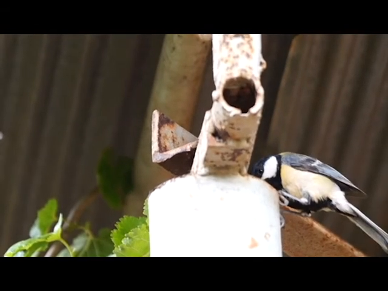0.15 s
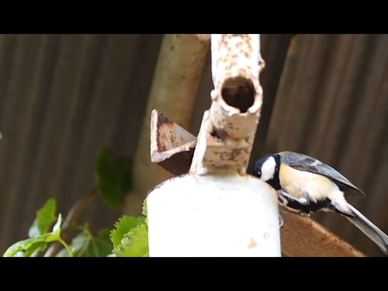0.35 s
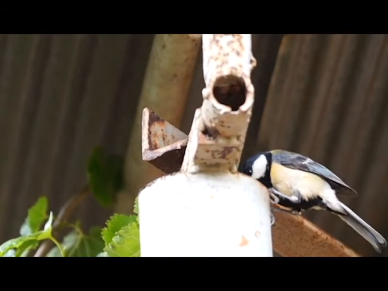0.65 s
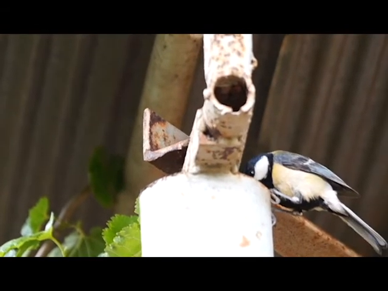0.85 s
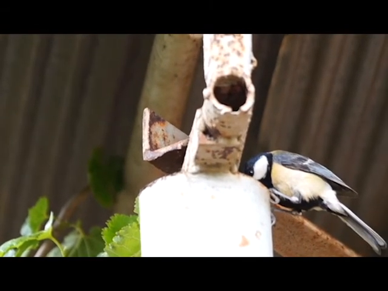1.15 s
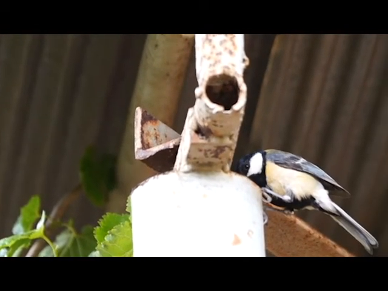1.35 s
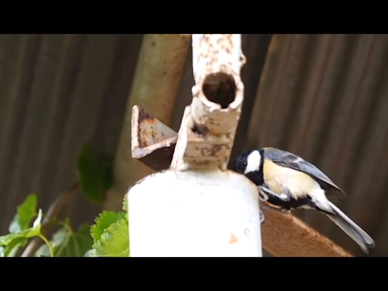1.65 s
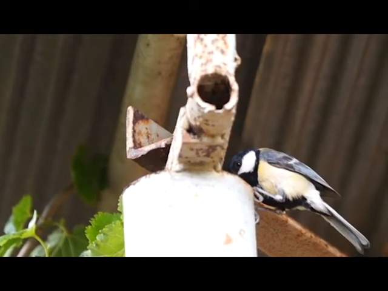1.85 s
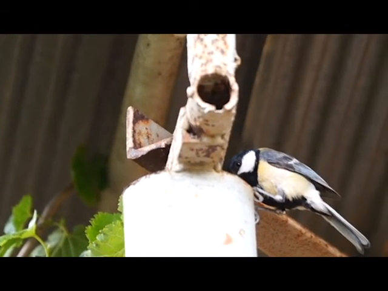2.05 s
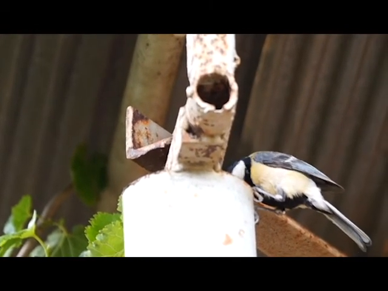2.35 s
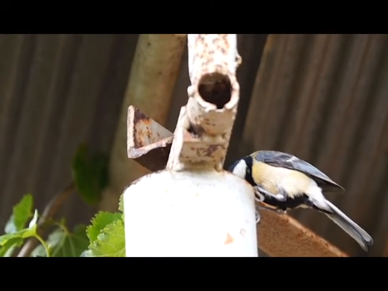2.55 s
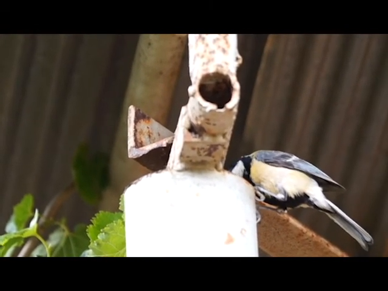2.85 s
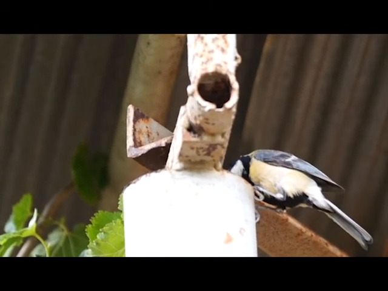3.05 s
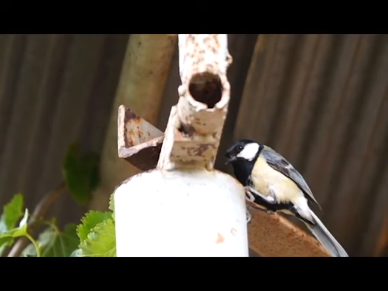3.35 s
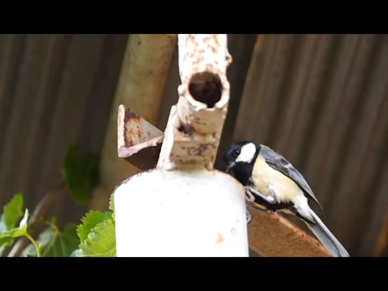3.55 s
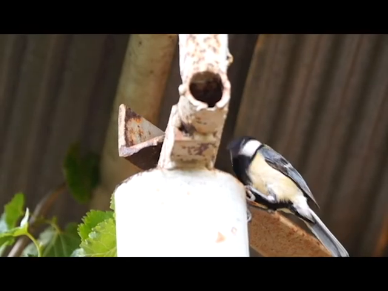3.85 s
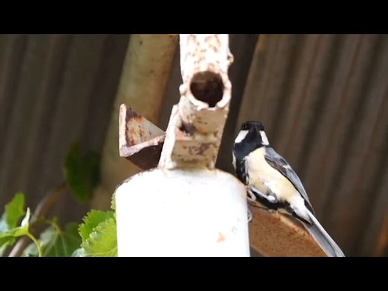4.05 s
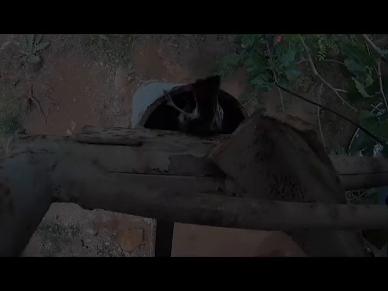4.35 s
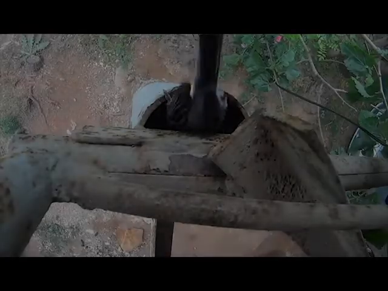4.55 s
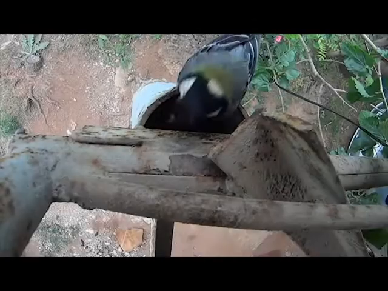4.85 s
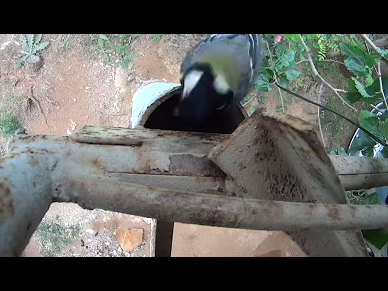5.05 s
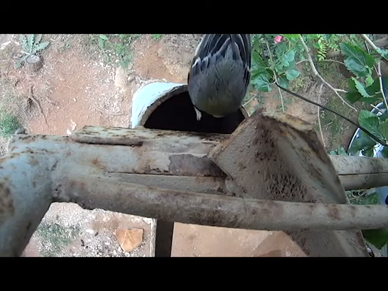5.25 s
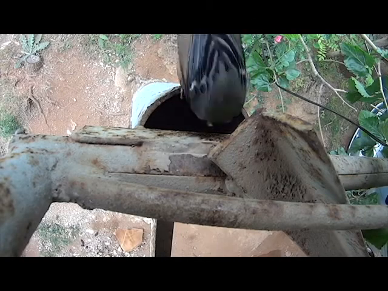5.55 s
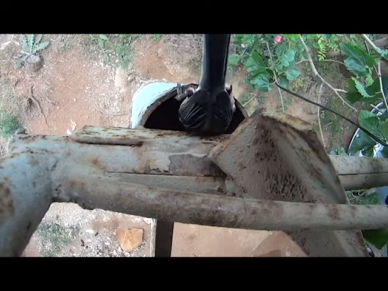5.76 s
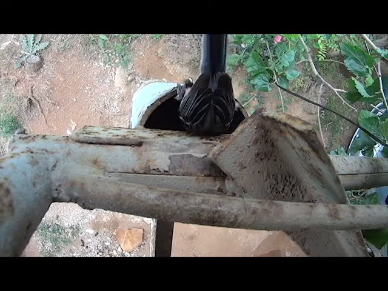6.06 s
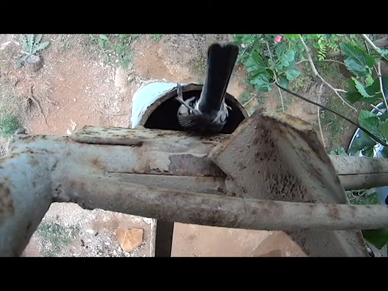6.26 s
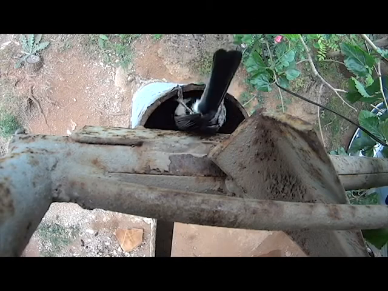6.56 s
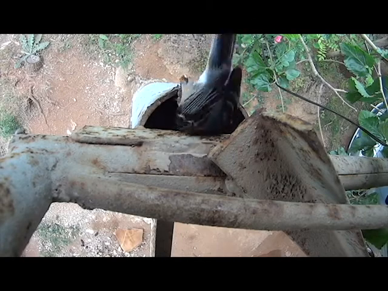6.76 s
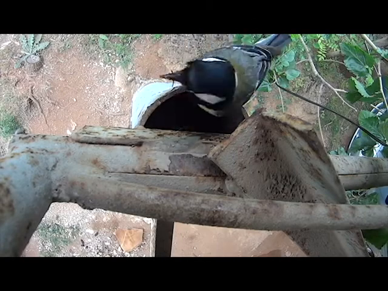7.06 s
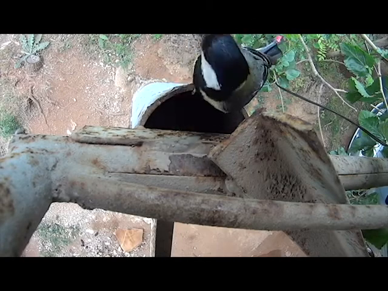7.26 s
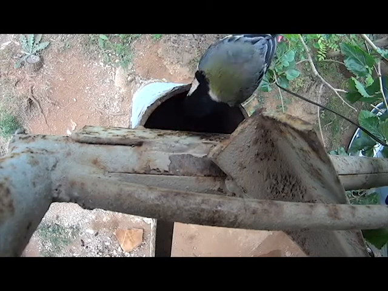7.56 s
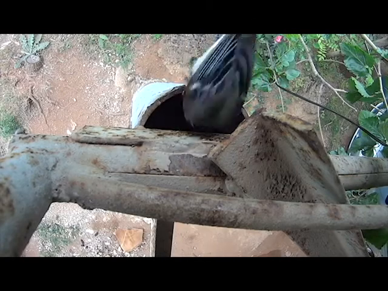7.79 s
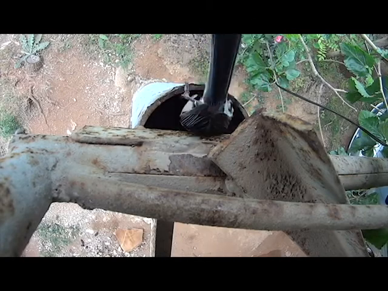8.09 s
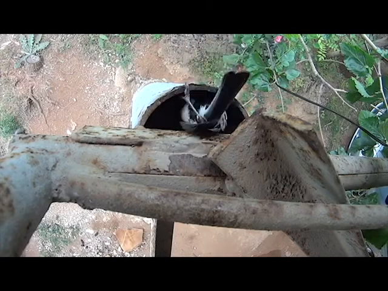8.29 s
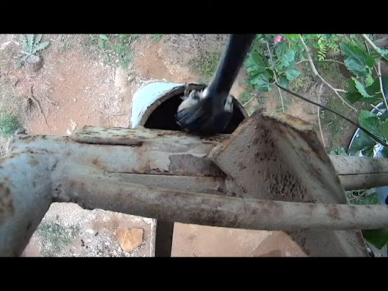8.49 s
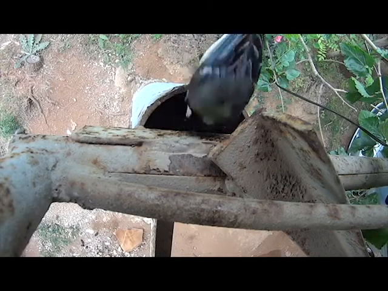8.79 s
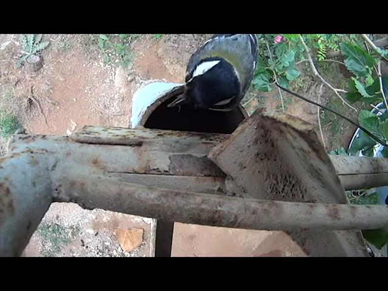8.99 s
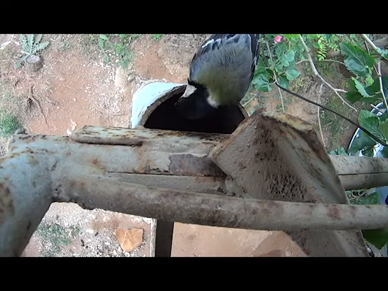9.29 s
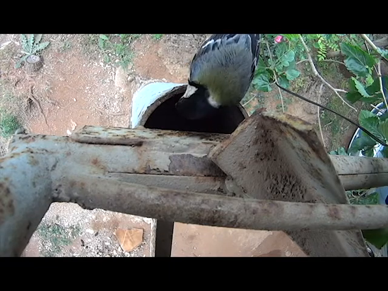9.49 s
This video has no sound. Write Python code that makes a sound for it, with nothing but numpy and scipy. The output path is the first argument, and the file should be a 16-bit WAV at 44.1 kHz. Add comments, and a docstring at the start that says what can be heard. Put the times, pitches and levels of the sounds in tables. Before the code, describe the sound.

Outdoors in a town yard, distant bass-heavy traffic rumble lies under faint, regular, high dipping begging calls, a few husky chirps and thin whistles. At about four seconds the sound cuts to a microphone at an iron pipe's rim: loud nestlings whistle, squeal and rasp in rapid bursts. A parent bird churrs briefly, while claws lightly knock the metal. The brood keeps begging to the end.

```python
"""A yard in a town, where tit nestlings beg inside an upright iron pipe while a parent feeds them.
From afar, town rumble (flickering bands of noise) lies under dipping calls, chirps and thin whistles.
Then, from a microphone at the rim: sliding whistles, squeals of two coupled voices, hoarse rasps
(noise through a throat), the parent's pulsed churr, and claws on iron (noise bursts ringing the pipe)."""
import sys
import numpy as np
from scipy import signal
from scipy.fft import rfft, irfft
from scipy.io import wavfile
from scipy.ndimage import uniform_filter1d

SR = 44100
rng = np.random.default_rng(int(sys.argv[2]) if len(sys.argv) > 2 else 0)


def bounce(signal):
    """Save signal as a 16-bit WAV file at the path given by the first command-line argument."""
    frames = np.transpose(np.atleast_2d(signal))
    limited = np.clip(frames, -1, 1)
    pcm = np.round(limited * 32767).astype(np.int16)
    wavfile.write(sys.argv[1], SR, pcm)


N = 424683

MOVE_S = 4.14  # from here on the listener is at the rim
FAR_TOP_HZ, NEAR_TOP_HZ = 15700, 11030  # top cut at each position


def undb(db):
    """Amplitude factor for a level in dB."""
    return 10 ** (np.asarray(db) / 20)


def unit(x):
    """Scale to an RMS of 1."""
    return x / np.sqrt(np.mean(x ** 2))


def walk(rate, size=N):
    """Random levels held 1 / rate s, smoothed twice over that time; RMS 1."""
    hold = max(int(SR / rate), 1)
    steps = np.repeat(rng.standard_normal(size // hold + 1), hold)
    smooth = uniform_filter1d(uniform_filter1d(steps, hold), hold)
    return unit(smooth[:size])


def turns(hz):
    """Phase in radians of a tone that follows the pitch hz."""
    return 2 * np.pi * np.cumsum(hz) / SR


def note(start_s, end_s, edge_s):
    """Place of a note, its progress 0-1 and a gate with soft edges."""
    first, last = int(start_s * SR), min(int(end_s * SR), N)
    u = np.linspace(0, 1, last - first)
    from_edge_s = np.minimum(u, 1 - u) * (end_s - start_s)
    gate = np.sin(np.pi / 2 * np.clip(from_edge_s / edge_s, 0, 1)) ** 2
    return slice(first, last), u, gate


def throat(x, modes, patchy_db=0, wander=0):
    """Resonances side by side, wavering in level; those below 6 kHz can drift in pitch as the mouth works."""
    out = 0
    for k, (hz, width_hz, db) in enumerate(modes):
        drift = wander * (hz < 6000) * walk(14)
        spin = np.exp(1j * turns(hz * (1 + drift)))
        # shift the resonance down to 0 Hz, low-pass, and shift back up
        lowpass = signal.butter(2, width_hz / 2, fs=SR, output="sos")
        band = (signal.sosfilt(lowpass, x / spin) * spin).real
        level = undb(db + patchy_db * walk(30)) / np.sqrt(width_hz)
        out = out + (-1) ** k * level * band
    return unit(out)


def air(colour, alike_hz, flicker_db):
    """Noise in half-octave bands that flicker independently; only the bass is alike left and right."""
    f = np.maximum(np.fft.rfftfreq(N + 1, 1 / SR), 1)
    hz, db = np.transpose(colour)
    shape = undb(np.interp(np.log(f), np.log(hz), db))
    mid, side = rfft(rng.standard_normal((2, N + 1))) * shape
    side = side / np.sqrt(1 + (alike_hz / f) ** 4)
    stereo = np.array([mid + side, mid - side])
    out = 0
    for centre in np.arange(3, 15, .5):  # log2 of Hz
        band = np.clip(1 - 2 * abs(np.log2(f) - centre), 0, 1)
        depth_db = flicker_db * min(9 / centre, 1) ** 3  # shallower above 512 Hz
        out = out + undb(depth_db * walk(8)) * irfft(band * stereo, N + 1)[:, :N]
    return unit(out)


def spread(x, t60, wet_db, pan_db):
    """Direct sound, pan_db louder on the left, and a short tail that differs left and right."""
    t = np.arange(int(t60 * SR)) / SR
    tail = rng.standard_normal((2, len(t))) * undb(-60 * t / t60)
    tail *= undb(wet_db) / np.sqrt(np.sum(tail ** 2, 1, keepdims=True))
    tail[:, 0] += undb(np.array([pan_db, -pan_db]) / 2)  # direct sound
    return signal.fftconvolve(x[None], tail, axes=1)[:, :N]


# Level of the town traffic heard from afar: time_s [s], level_db [dB]
RUMBLE = [(0.0, -43), (3.0, -41.5), (4.13, -43.5)]
# Colour of the town noise: frequency_hz [Hz], relative density_db [dB per Hz]
TOWN = [(30, -21.5), (130, 2), (210, -0.5), (555, -15.5), (6700, -35), (15500, -43.5)]


def town_rumble(t):
    """Distant traffic: bass-heavy noise following a slow level curve, 1 dB louder on the left."""
    time_s, level_db = np.transpose(RUMBLE)
    side_db = np.array([[.5], [-.5]])
    return air(TOWN, 530, 2.05) * undb(np.interp(t, time_s, level_db) + side_db)


# Faint steady whistles further off: start_s [s], end_s [s], pitch_hz [Hz], level_db [dB]
TONES = [(0., .95, 1590, -62), (2.4, 2.56, 2300, -61), (7.1, 7.28, 1960, -58), (3.25, 3.42, 2350, -62)]


def thin_whistles():
    """Distant sine tones that waver a little in pitch and strongly in level."""
    out = np.zeros(N)
    for start_s, end_s, pitch_hz, db in TONES:
        at, u, gate = note(start_s, end_s, 0.028)
        level = undb(db + 11 * np.tanh(walk(9.2, len(u))))
        out[at] += gate * level * np.sin(turns(pitch_hz * (1 + 0.01093 * walk(22, len(u)))))
    return out


# Distant begging calls, each sounding from 0.06 s before to 0.05 s after: time_s [s]
FAR_CALLS = [0.109, 0.25, 0.41, 0.56, 0.719, 0.92, 1.05, 1.19, 1.35, 1.58, 1.789, 1.941, 2.12, 2.23, 2.34,
             2.479, 2.689, 2.89, 3.041, 3.179, 3.371, 3.591, 3.8, 3.971]


def far_begging():
    """The brood from afar: each call a dipping whistle in a smear of throat-shaped noise."""
    out = np.zeros(N)
    hoarse = throat(rng.standard_normal(N), [(3060, 560, 1), (6700, 1200, 8.5)], patchy_db=4.5)
    variety = rng.standard_normal((len(FAR_CALLS), 2))
    for time_s, (size, pitch) in zip(FAR_CALLS, variety):
        at, u, gate = note(time_s - .06, time_s + 0.05, 0.035)
        dip = 1 + 0.5 * (.6 - u) ** 2 + 0.012 * walk(63.0, len(u))
        tone = np.sin(turns((6600 + 150 * pitch) * dip))
        out[at] += gate * undb(-57.5 + 2 * np.tanh(size)) * (.85 * tone + .35 * hoarse[at])
    # the rest of the brood, and other nests, chatter on faintly
    return out + undb(-72.5 + 4.8 * walk(9)) * hoarse


# Other small birds in the yard: start_s [s], from_hz [Hz], to_hz [Hz]
CHIRPS = [(.38, 3500, 2930), (.86, 3890, 3020), (1.95, 4000, 4870), (2.31, 5500, 6740)]


def chirps():
    """Husky chirps: gliding tones roughened by fast random level changes."""
    out = np.zeros(N)
    for start_s, from_hz, to_hz in CHIRPS:
        at, u, gate = note(start_s, start_s + .09, 0.011)
        husky = 1 + walk(600, len(u))
        out[at] += gate * undb(-57.5) * husky * np.sin(turns(from_hz + (to_hz - from_hz) * u))
    return out


# Colour of the air at the rim: frequency_hz [Hz], relative density_db [dB per Hz]
YARD = [(30, -2.5), (400, -4), (2000, -3.5), (11000, -12.5)]
# Level of that air [dB]
YARD_DB = -50.5


def yard_air():
    """Quiet broadband air around the microphone at the rim."""
    return air(YARD, 140, 0.99) * undb(YARD_DB)


# One voice alone, sliding: start_s [s], end_s [s], from_hz [Hz], to_hz [Hz],
# level_db [dB, before the fade of deep falls and panning]
WHISTLES = [(4.165, 4.235, 7500, 6720, -32), (4.389, 4.497, 7800, 5540, -36.5),
            (4.511, 4.627, 4570, 3420, -47), (4.671, 4.739, 7700, 6690, -33),
            (4.839, 4.93, 7680, 6960, -25.5), (4.99, 5.004, 5250, 4830, -42),
            (5.09, 5.169, 7860, 6830, -27), (5.276, 5.352, 7720, 6660, -30.5),
            (5.469, 5.54, 7750, 6500, -30), (5.657, 5.722, 7700, 6440, -40),
            (6.573, 6.612, 7550, 6620, -35.5), (6.615, 6.653, 6410, 6980, -33.5),
            (6.752, 6.809, 7580, 6950, -33), (6.789, 6.82, 6540, 6800, -32.5),
            (6.932, 6.981, 7670, 6800, -31), (6.98, 7.004, 6400, 6940, -31),
            (7.127, 7.2, 7780, 6910, -24.5), (7.345, 7.408, 7730, 6780, -26),
            (7.539, 7.59, 7460, 5280, -29), (7.674, 7.684, 5270, 4700, -38),
            (7.754, 7.79, 8080, 7040, -31.5), (7.794, 7.836, 4826, 4330, -37),
            (7.841, 7.88, 4360, 4770, -34), (8.232, 8.254, 5700, 5270, -37.5),
            (8.694, 8.762, 8220, 5400, -42), (8.861, 8.92, 7900, 5190, -34), (9.068, 9.09, 8104, 7100, -34),
            (9.428, 9.494, 6400, 4720, -34), (9.594, 9.634, 7980, 7120, -25.5)]
SLIDE_POWER = 2.2  # higher: the slide comes earlier


def whistles():
    """The beak favours the octave; the fundamental shows only near a throat resonance, where the voice clears."""
    out, clear = np.zeros(N), np.zeros(N)
    for start_s, end_s, from_hz, to_hz, db in WHISTLES:
        at, u, gate = note(start_s, end_s, 0.00055)
        slide = np.cos(np.pi / 2 * u) ** SLIDE_POWER
        f = (to_hz + (from_hz - to_hz) * slide) * (1 + 0.0122 * walk(178.6, len(u)))
        resonance = np.exp(-((f / 2 - 3340) / 140) ** 2)
        clear[at] = gate * resonance * (u * u if to_hz < from_hz else 1)  # a fall clears late
        husk = np.clip(.35 + (4500 - f) / 500, .35, 1) * (1 - clear[at])  # low calls are breathy
        p = turns(f / 2)
        octave = np.sin(2 * p) * (1 - husk ** 2 + husk * walk(1500, len(u)))
        low = undb(-5.0) * clear[at] * (np.sin(p) + 0.39 * np.sin(3 * p))
        db = db - np.maximum(from_hz - f - 1100, 0) / 110  # a deep fall leaves the beak resonance and fades
        level = undb(db + 2.07 * walk(41.0, len(u)))
        ending = np.clip((1 - u) / 0.055, 0, 1)
        out[at] += level * gate * ending * np.sqrt(2) * (octave + low)
    return out, clear


# Hoarse begging: start_s [s], end_s [s], from_db [dB], to_db [dB], before yielding to clearer voices
RASPS = [(4.173, 4.271, -36, -15), (4.252, 4.393, -22.5, -51), (4.68, 4.787, -41, -23.5),
         (4.765, 5.003, -32, -28.5), (5.112, 5.264, -34.5, -22.5), (5.329, 5.401, -27, -34.5),
         (5.497, 5.575, -32.5, -22.5), (5.95, 6.054, -35, -16.5), (6.122, 6.227, -33.5, -12),
         (6.308, 6.409, -27.5, -25.5), (6.386, 6.51, -42.5, -26), (6.505, 6.636, -43.5, -41),
         (6.626, 6.696, -29.5, -31), (6.764, 6.836, -42, -19), (6.809, 6.967, -29, -41.5),
         (6.949, 7.02, -42, -18), (6.995, 7.124, -28.5, -32.5), (7.193, 7.26, -23.5, -25.5),
         (7.368, 7.68, -28, -27), (7.778, 7.959, -31.5, -20.5), (7.944, 8.132, -25.5, -41),
         (8.12, 8.225, -32, -27.5), (8.207, 8.298, -45.5, -32), (8.262, 8.364, -45, -22),
         (8.424, 8.559, -36, -19.5), (8.887, 8.996, -27, -22), (8.974, 9.073, -36, -34),
         (9.055, 9.177, -20.5, -29.5), (9.202, 9.356, -28.5, -28), (9.333, 9.401, -45, -34.5),
         (9.385, 9.525, -26, -29)]
# Nestling throat resonances: frequency_hz [Hz], width_hz [Hz], relative level_db [dB]
RASP_THROAT = [(1644, 270, -19), (3500, 1400, -7), (5130, 1770, -3.5), (7700, 1540, 5), (9570, 1400, -9.5)]
RASP_EDGE_S = 0.021


def rasps():
    """The syrinx slips into chaos: noise in uneven spurts of a few ms through the throat."""
    effort = np.zeros(N)
    for start_s, end_s, from_db, to_db in RASPS:
        at, u, gate = note(start_s, end_s, RASP_EDGE_S)
        effort[at] += gate * undb(from_db + (to_db - from_db) * u)
    spurts = undb(1.9 * walk(600)) * rng.standard_normal(N)
    return throat(spurts, RASP_THROAT, patchy_db=3.0, wander=0.059) * effort


# Claw knocks on the rim: start_s [s], level_db [dB, before the burst's trim and the ring]
KNOCKS = [(4.174, -42.5), (4.548, -47.5), (4.704, -37), (5.37, -50), (5.612, -39.5), (6.17, -51),
          (6.637, -50.5), (6.792, -55.5), (6.954, -47.5), (8.11, -48.5), (8.798, -48.5)]
# Ringing modes of the pipe: frequency_hz [Hz], relative level_db [dB], t60_s [s]
PIPE = [(232, -8, .11), (350, -5, .1), (800, -3, .06), (1380, -5, .05)]


def knocks():
    """Claws knock and scuff the rim: noise bursts over a faint scuffle ring the pipe briefly."""
    t = np.arange(SR // 4) / SR
    claws = undb(-88 + 4 * np.tanh(walk(9))) * rng.standard_normal(N)
    for start_s, db in KNOCKS:
        at, u, gate = note(start_s, start_s + 0.034, 0.0025)
        claws[at] += undb(db - 18.0 - 18.3 * u) * gate * rng.standard_normal(len(u))
    ring = sum(undb(db - 60 * t / t60_s) * np.sin(2 * np.pi * hz * t) for hz, db, t60_s in PIPE)
    highpass = signal.butter(2, 180, "high", fs=SR, output="sos")
    return signal.sosfilt(highpass, signal.fftconvolve(claws, ring)[:N])


# Both sides of the syrinx in step: start_s [s], end_s [s], lead_from_hz [Hz], lead_to_hz [Hz],
# second_from_hz [Hz], end_level_db [dB, before the ladder and panning]
SQUEALS = [(4.2, 4.28, 3300, 3820, 4100, -32.5), (4.766, 4.851, 3597, 3715, 3064, -32),
           (5.158, 5.254, 3544, 3744, 3010, -30), (5.523, 5.581, 3420, 4040, 4050, -37.5),
           (5.986, 6.047, 2890, 3630, 2663, -23.5), (6.143, 6.223, 3190, 3765, 2856, -29.5),
           (6.325, 6.398, 3110, 3880, 2660, -24), (6.468, 6.535, 3360, 3710, 2730, -40),
           (6.809, 6.872, 3497, 3950, 4370, -36), (6.997, 7.052, 3580, 4040, 4410, -32),
           (7.2, 7.251, 3710, 4336, 4650, -35), (7.401, 7.474, 3540, 4060, 4410, -31.5),
           (7.856, 7.944, 3540, 3730, 2940, -29.5), (7.984, 8.038, 3445, 3900, 2820, -28.5),
           (8.135, 8.212, 3110, 3930, 2550, -24), (8.274, 8.355, 3145, 3870, 2653, -23.5),
           (8.456, 8.544, 3430, 3910, 2907, -25), (8.919, 8.984, 3324, 3580, 2900, -26.5),
           (9.07, 9.137, 3090, 3690, 2730, -24), (9.221, 9.326, 3367, 3970, 2918, -23),
           (9.405, 9.504, 3507, 3940, 2990, -25.5)]
# Relative level [dB] of the tone n x lead + m x second: a row for each n from 0,
# its columns m rising from max(1 - n, -2)
LADDER_DB = [
    [-3.5, -3.5, -0.5],
    [-4.5, -9, -4.5],
    [-22, 0.5, -10.5],
    [-16, -9, -12.5],
    [-1, -7],
]
SWELL_DB_PER_OCTAVE = 33  # effort raises pitch and level together when the second voice is below the lead


def ladder_db(n, m):
    """Level of one sum or difference tone; those outside the table sit at -22 dB."""
    column = m - max(1 - n, -2)
    listed = n < len(LADDER_DB) and 0 <= column < len(LADDER_DB[n])
    return LADDER_DB[n][column] if listed else -22


def squeals():
    """Two coupled oscillators: a ladder of sum and difference tones, lifted near the beak resonance."""
    out, locked = np.zeros(N), np.zeros(N)
    for start_s, end_s, from_hz, to_hz, second_hz, end_db in SQUEALS:
        ratio = second_hz / from_hz
        at, u, gate = note(start_s, end_s, .018)
        locked[at] = gate
        # a high second voice holds, then sweeps up
        glide = from_hz + (to_hz - from_hz) * (u ** 2.3 if ratio > 1 else u)
        swell = end_db + SWELL_DB_PER_OCTAVE * np.log2(glide / to_hz) * (ratio < 1)
        lead = glide * (1 + 0.0038 * walk(221, len(u)) + .006 * walk(41.1, len(u)))
        second = ratio * lead
        for n in range(6):
            for m in range(-3, 4):
                # a second voice above the lead couples loosely
                db = ladder_db(n, m) - 12 * (m < 0 and ratio > 1)
                f = n * lead + m * second
                beak = 1 + 2.0 * np.exp(-((f - 7450) / 450) ** 2)
                beak = beak * (f > 2300) * (f < NEAR_TOP_HZ)
                if not beak.any():
                    continue
                level = gate * beak * undb(swell + db + 2.48 * walk(20.7, len(u)))
                rough = 1 + f / 30000 * walk(1500, len(u))  # higher tones are rougher
                out[at] += level * rough * np.sin(turns(f) + 2 * np.pi * rng.random())
    return out, locked


# The parent's scolding notes: start_s [s]
CHURR = [5.298, 5.364, 5.431, 5.5, 5.568, 5.641, 5.716, 5.797, 5.875, 5.956, 6.09]
# The parent's throat resonances: frequency_hz [Hz], width_hz [Hz], relative level_db [dB]
CHURR_THROAT = [(1770, 470, 4.5), (2870, 1330, 1.5), (4750, 1600, -2.5), (6040, 4200, -7)]
CHURR_NOTE_S, CHURR_DRAG = 0.0446, 0.022  # first length [s]; seconds gained per second of scolding


def churr():
    """Short scolding notes of irregular noise pulses, lengthening as they go, each swelling to its end."""
    gates = np.zeros(N)
    for start_s in CHURR:
        length_s = CHURR_NOTE_S + CHURR_DRAG * (start_s - CHURR[0])
        at, u, gate = note(start_s, start_s + length_s, 0.0061)
        gates[at] = gate * undb(-36.5 + 2.3 * u)
    pulses = undb(3.3 * walk(450)) * rng.standard_normal(N)
    return gates * throat(pulses, CHURR_THROAT, patchy_db=2)


def scene():
    """Town rumble from afar, then the rim of the pipe; the distant birds are mixed in throughout."""
    t = np.arange(N) / SR
    far = town_rumble(t)
    distant_birds = spread(thin_whistles() + far_begging() + chirps(), 0.066, -0.056, 0.59)
    tone, clear = whistles()
    squeal, locked = squeals()
    # rasps drop back while a chick sings clearly or squeals
    hoarse = rasps() * (1 - .85 * clear) * (1 - .55 * locked)
    chicks = spread(tone + squeal + hoarse, 0.046, -7.5, -2.05)
    rim = spread(knocks(), .03, -5, .2)
    parent = spread(churr(), 0.067, -6.0, -1.9)
    near = yard_air() + chicks + rim + parent
    return np.where(t < MOVE_S, far, near) + distant_birds


def record(dry):
    """Each position has its own recorder, with its own steep top cut."""
    is_far = np.arange(N) < MOVE_S * SR
    out = 0
    for top_hz, here in ((FAR_TOP_HZ, is_far), (NEAR_TOP_HZ, ~is_far)):
        top_cut = signal.ellip(12, .2, 70, top_hz, fs=SR, output="sos")
        out = out + signal.sosfilt(top_cut, dry * here)
    return out


dry = scene()
out = record(dry)
bounce(out)
```